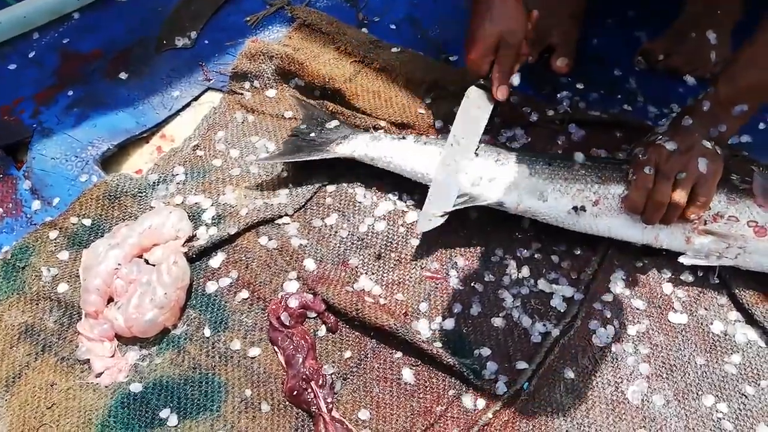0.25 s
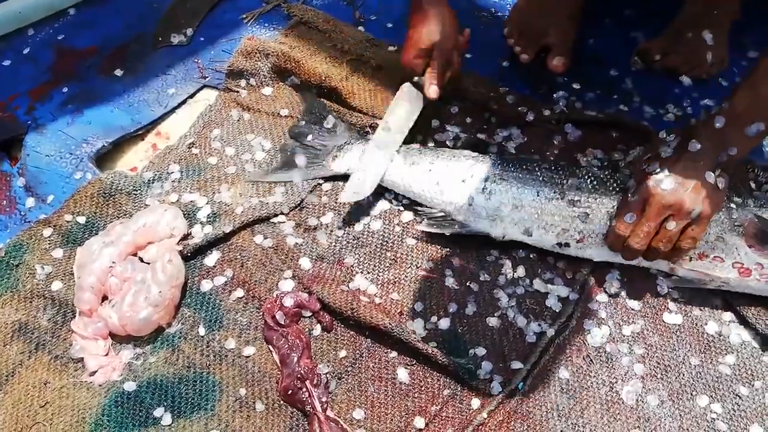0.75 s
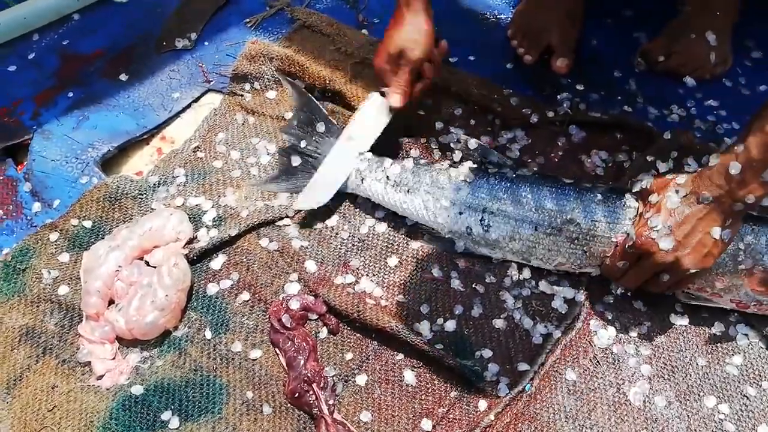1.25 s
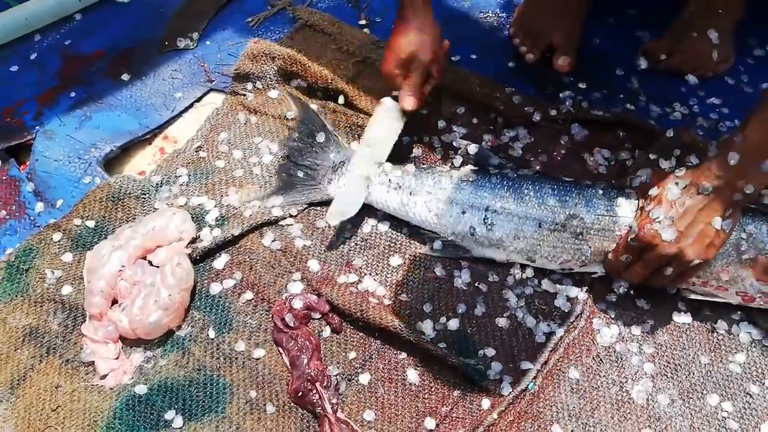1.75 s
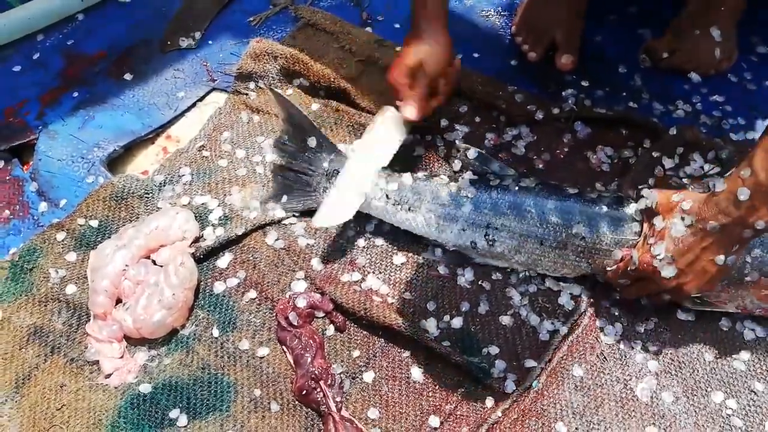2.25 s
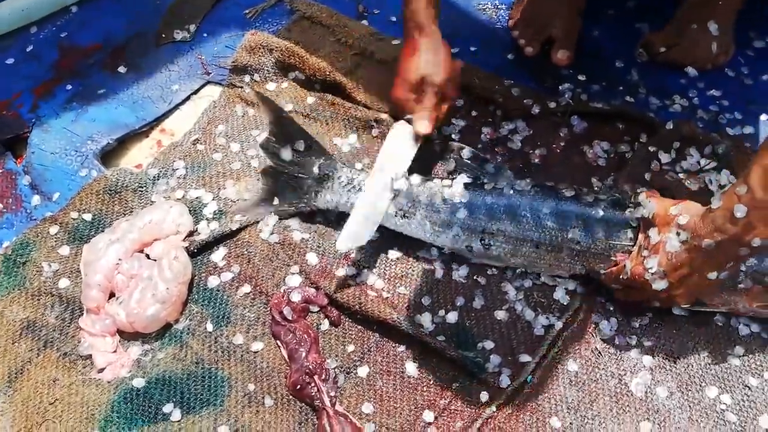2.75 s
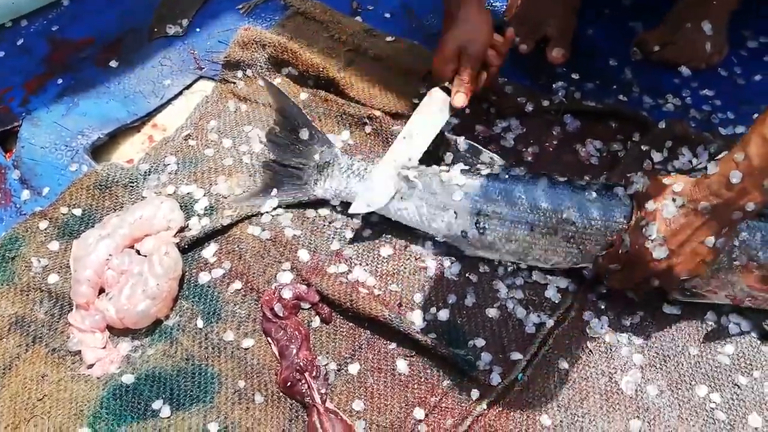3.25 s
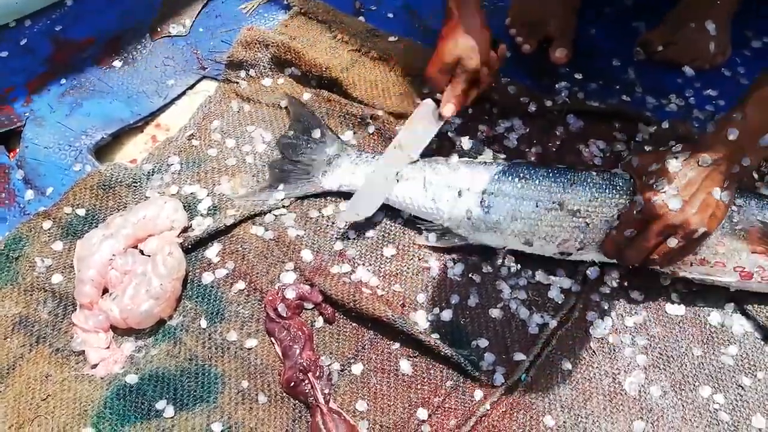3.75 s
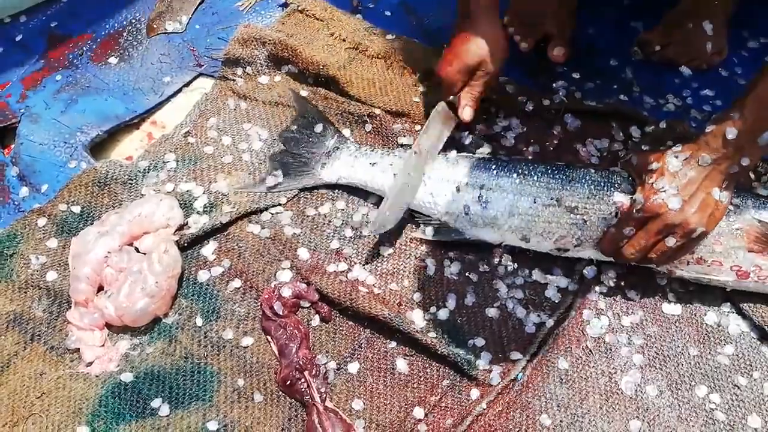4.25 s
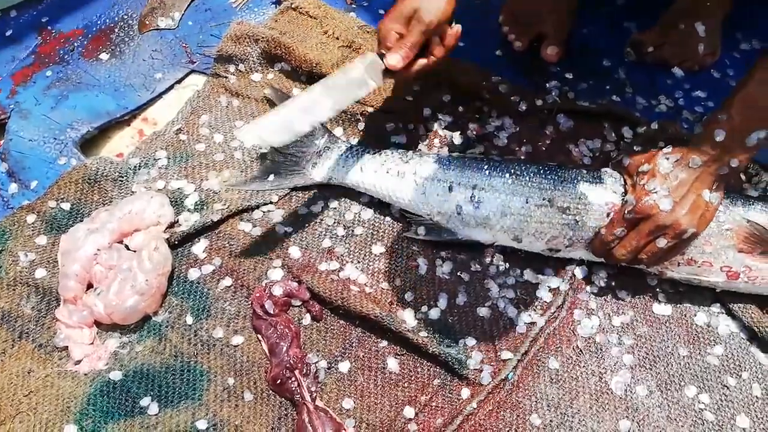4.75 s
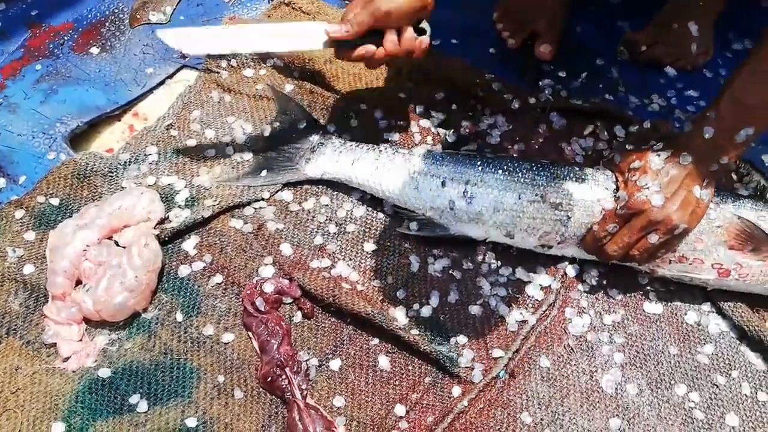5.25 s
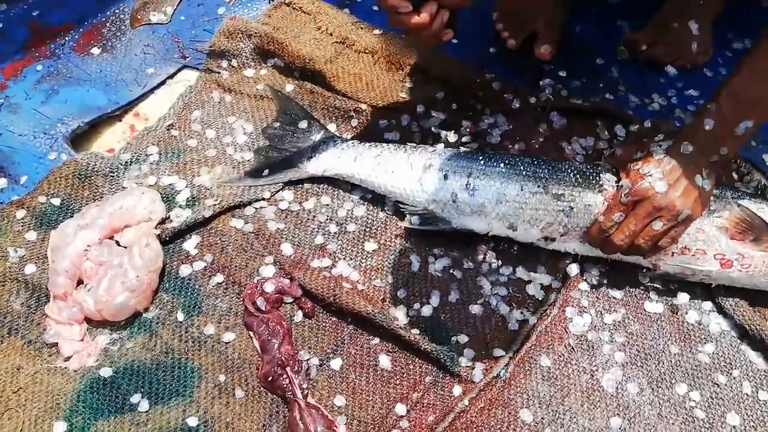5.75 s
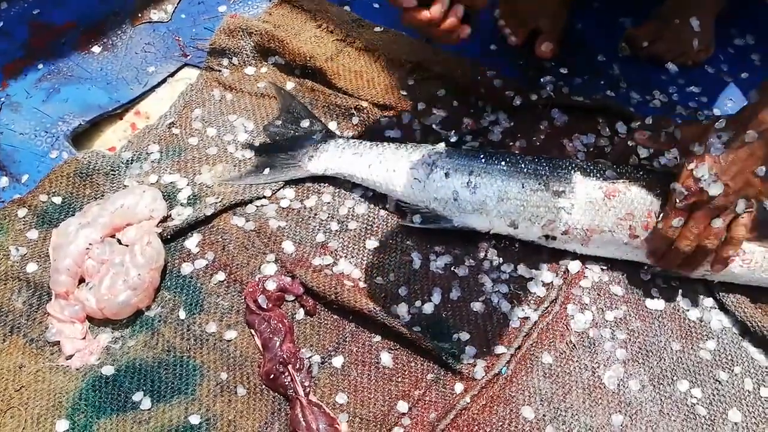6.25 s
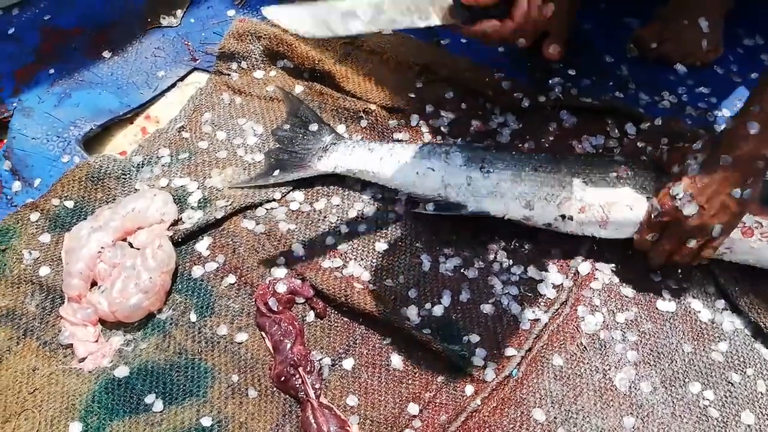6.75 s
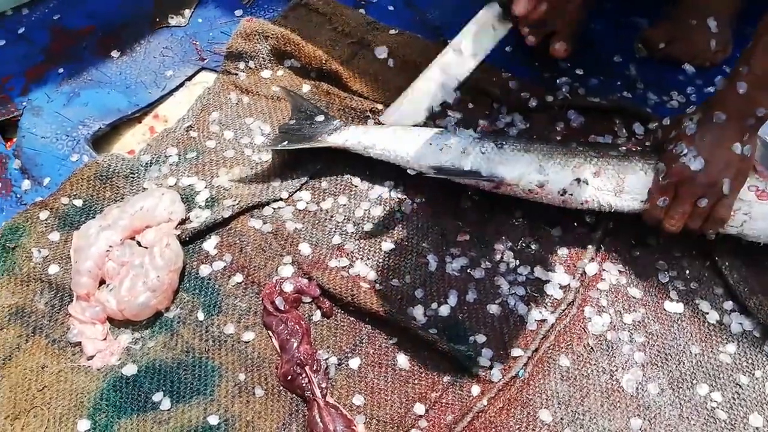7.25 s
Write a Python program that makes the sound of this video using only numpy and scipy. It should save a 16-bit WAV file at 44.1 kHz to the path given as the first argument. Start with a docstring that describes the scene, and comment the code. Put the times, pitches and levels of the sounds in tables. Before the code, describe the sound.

Quick, bright rasping scrapes of a blade on fish scales, close up on a boat, over a steady low engine hum and faint lapping water.

```python
"""Scaling a fish on a boat

A knife rakes the scales off a fish, about four quick strokes a second: each is a crackling burst of
snapping scales that makes the blade ring and scatters round the boat. An engine drones (tones in step with
its firing) and clatters (noise through ringing panels) below. A few waves swish past the hull as swells
of shaped noise and bubbles, and a gain control ducks briefly after the loudest strokes."""
import sys
import numpy as np
from scipy import signal
from scipy.fft import rfft, irfft, next_fast_len
from scipy.io import wavfile
from scipy.ndimage import uniform_filter1d, map_coordinates

SR = 44100
rng = np.random.default_rng(int(sys.argv[2]) if len(sys.argv) > 2 else 0)


def wrap_up_sound(samples):
    """Save the sound to the file named by the first command line argument, as 16-bit audio."""
    columns = np.atleast_2d(samples).T
    # keep every value between -1 and 1, then stretch to whole-number steps
    tamed = np.clip(columns, -1, 1)
    steps = np.round(tamed * 32767).astype(np.int16)
    wavfile.write(sys.argv[1], SR, steps)


N = 331191
TIME = np.arange(N) / SR  # s

# tone colours of the snapping scales, the rasping edge and the flesh: (f/Hz, density/dB per Hz)
SCALE_COLOUR = [(2500, -49.5), (6000, -4), (7000, -3), (8000, 0.5), (9600, 1), (10400, -1), (11300, -2),
                (13000, -6), (15500, -16.5)]
EDGE_COLOUR = [(1500, -28.5), (3300, -4.5), (4200, -1), (4800, 1.5), (5500, 0), (6100, -0.5), (7200, -7.5),
               (11000, -27.5)]
FLESH_COLOUR = [(250, -29), (600, -11.5), (1400, -5.5), (2000, 0), (2400, 5), (2900, 2.5), (3400, -2.5),
                (4500, -21), (8000, -44)]
# resonance where the knife touches: (half width/Hz, boost/dB)
SCALE_PEAK, EDGE_PEAK = (560, 5.5), (400, 6)
# engine speed: (t/s, firing rate/Hz)
ENGINE_SPEED = [(0, 43.97), (4, 44.09), (6, 43.87), (7.5, 43.92)]


def amp(db):
    """Decibels to gain."""
    return 10 ** (np.asarray(db) / 20)


def unit(x):
    """Scaled to rms 1."""
    return x / np.sqrt(np.mean(x ** 2) + 1e-20)


def along(points, hz):
    """(Hz, value) points read on a log frequency axis."""
    f, v = np.transpose(points)
    return np.interp(np.log(hz + 1), np.log(f + 1), v)


def curves(rows):
    """One value per sample for each column after the time."""
    s, *cols = np.transpose(rows)
    return [np.interp(TIME, s, c) for c in cols]


def wobble(rate):
    """A smooth random curve through `rate` random points a second."""
    points = rng.standard_normal(int(N * rate / SR) + 4)
    return map_coordinates(points, [TIME * rate])


def filtered(x, response):
    """x with each frequency multiplied by the response."""
    m = next_fast_len(x.shape[-1] + SR // 4)
    spectrum = rfft(x, m) * response(np.fft.rfftfreq(m, 1 / SR))
    return irfft(spectrum, m)[..., :x.shape[-1]]


def coloured(x, spectrum):
    """x shaped by the given spectrum, at rms 1."""
    return unit(filtered(x, lambda hz: amp(along(spectrum, hz))))


def impulse(spectrum, peak=(0, 1, 0), size=512):
    """A causal click of energy 1 with the given spectrum and one resonance (Hz, half width Hz, dB)."""
    f = np.fft.rfftfreq(size, 1 / SR)
    hz, width, db = peak
    resonance_db = db / (1 + ((f - hz) / width) ** 2)
    # folding the cepstrum puts the click's energy as early as possible
    cepstrum = irfft(np.log(amp(along(spectrum, f) + resonance_db)))
    cepstrum[1:size // 2] *= 2
    cepstrum[size // 2 + 1:] = 0
    click = irfft(np.exp(rfft(cepstrum)))
    return click[None] / np.linalg.norm(click)


def crackle(size, per_s, spread_db, shared):
    """Stereo train of tiny snaps of uneven size; a share of their power is the same in both channels."""
    happens = rng.random(size) < per_s / SR
    sizes = happens * amp(spread_db * rng.standard_normal(size))
    share = np.clip(shared, 0, 1)
    common = np.sqrt(share) * rng.standard_normal(size)
    separate = np.sqrt(1 - share) * rng.standard_normal((2, size))
    return unit(sizes * (common + separate))


def add(track, s, sound):
    """Mix a stereo sound in at time s."""
    start = max(round(s * SR), 0)
    track[:, start:start + sound.shape[1]] += sound[:, :N - start]


def drone(firings, waver_db=1.56, lag=0.00014):
    """Firing pulses shake the hull; unequal cylinders put weaker tones between the main ones."""
    # mean level of the firing tone, its octave and its second octave: (t/s, level/dB)
    firing_level = [(0, -25), (1.2, -27), (1.7, -32), (2.05, -25), (2.55, -28), (3.15, -29.5), (3.45, -26),
                    (7.5, -26.5)]
    octave_level = [(0, -38), (1.5, -37.5), (2.8, -43.5), (3.9, -34.5), (5.7, -32), (6.6, -38), (7.5, -35)]
    second_octave_level = [(0, -39), (1.5, -41), (1.9, -36.5), (2.7, -38.5), (3.6, -37), (4.5, -38.5),
                           (5.3, -37), (6.5, -40), (7.5, -39)]
    # weaker hull tones: (multiple of the firing rate, mean level/dB)
    hull_tones = [(2.17, -43.5), (3.0, -42.5), (3.5, -51), (4.75, -54), (5.0, -50), (6.0, -45.5),
                  (6.25, -52), (6.5, -51.5), (7.0, -48), (7.25, -56.5), (7.5, -60.5), (7.75, -59),
                  (8.0, -55), (8.25, -63), (9.0, -63), (12.0, -63.5)]
    # rumble, and rumble that is opposite in the two channels: (f/Hz, density/dB per Hz)
    rumble_colour = [(15, -36), (30, -7), (60, 0.5), (85, 1.5), (120, -3.5), (170, -4.5), (240, -10),
                     (320, -13.5), (400, -21), (600, -28.5), (1500, -56), (15000, -90)]
    sway_colour = [(30, -22), (100, -0.5), (200, 2), (320, -1.5), (500, -3.5), (1200, -21), (15000, -60)]
    flutter, throb = .28, .18  # depths of the boards' slow and fast buzz

    # lag in s: the tones reach the left channel first
    heard = firings + np.array([[.5], [-.5]]) * lag * ENGINE_SPEED[0][1]

    def tone(order, phase, slip):
        wander = slip * wobble(6.1)  # rad
        return np.sqrt(2) * np.cos(2 * np.pi * (order * heard + phase) + wander)

    hum = amp(curves(firing_level)[0] + .5 * wobble(10)) * tone(1, rng.random(), slip=.03)
    for order, level, slip in ((2, octave_level, .074), (4, second_octave_level, .089)):
        hum = hum + amp(curves(level)[0] + waver_db * wobble(5)) * tone(order, rng.random(), slip)
    for order, db in hull_tones:
        # the upper tones start within about two thirds of a cycle of each other and chug loosely
        phase = rng.random() * (1 if order < 5.8 else .65)
        hum = hum + amp(db + waver_db * wobble(5)) * tone(order, phase, slip=0.089)

    rumble = coloured(rng.standard_normal(N), rumble_colour)
    upper = filtered(rumble, lambda hz: np.clip((hz - 180) / 80, 0, 1))
    # the boards buzz once every two firings, in step with the shaft, and twice every firing
    buzz = flutter * np.cos(np.pi * firings) + throb * np.cos(4 * np.pi * firings)
    rumble = rumble + buzz * upper
    sway = coloured(rng.standard_normal(N), sway_colour)
    return hum + amp(-36.0) * rumble + amp(-47.0) * sway * np.array([[1], [-1]])


def clatter(firings, repeat=0.4, level_db=-46):
    """Valves and injectors tick on the ringing casing, partly alike in every cycle of four firings."""
    # overall colour: (f/Hz, density/dB per Hz)
    clatter_colour = [(200, -64), (450, -18), (620, 3), (820, 4.5), (1000, -2), (1320, 2.5), (1600, -2.5),
                      (2300, -4.5), (2750, -9), (3500, -10.5), (5000, -27.5), (8000, -15), (15000, -84)]
    # ringing engine panels: (f/Hz, width/Hz, boost/dB)
    casing_panels = [(528, 26, 4), (820, 30, 3.5), (876, 32, 3), (1056, 22, 10), (1849, 30, 13.5),
                     (2156, 40, 7), (2560, 50, 6), (3015, 80, 14), (3165, 50, 9), (3690, 50, 7),
                     (3980, 130, 10)]
    # left minus right: (f/Hz, level/dB)
    side_lean = [(300, 6), (550, 10.5), (850, 6.5), (1250, -7.5), (2500, -21.0), (5000, -11.5)]
    pitch_drift = .0022  # share by which the panels' pitch wavers

    cycle = crackle(SR // 11, per_s=6000, spread_db=4, shared=0)
    place = (firings / 4 % 1 * cycle.shape[1]).astype(int)
    share = np.clip(repeat, 0, 1)
    rattle = np.sqrt(share) * cycle[:, place] + np.sqrt(1 - share) * rng.standard_normal((2, N))
    rattle = rattle * amp(.8 * wobble(4))

    def casing(f):
        panels_db = sum(db / (1 + (2 * (f - hz) / width) ** 2) for hz, width, db in casing_panels)
        lean_db = along(side_lean, f) * np.array([[.5], [-.5]])
        return amp(along(clatter_colour, f) + panels_db + lean_db)

    ringing = filtered(rattle, casing)
    clock = np.cumsum(1 + pitch_drift * wobble(9))  # reading at an uneven pace bends the pitch
    bent = [map_coordinates(channel, [clock], mode='mirror') for channel in ringing]
    return amp(level_db) * unit(np.array(bent))


def lapping(level_db=-52, restless_db=3.5):
    """Ripples keep licking the hull: crackling noise of restless level, stronger on the right."""
    # (f/Hz, density/dB per Hz)
    ripple_colour = [(600, -19), (1300, 3), (1900, -4.5), (2350, 4.5), (2900, -10), (5000, -36),
                     (15000, -60)]
    water = coloured(crackle(N, per_s=2500, spread_db=4, shared=0.06), ripple_colour)
    return amp(level_db + restless_db * wobble(12)) * water * amp([[-1], [1]])


def bubbles(count=2500, centre_hz=1500, cycles=9):
    """Stereo swarm of small bubbles at rms 1, each a short ring of rising pitch."""
    track, t = np.zeros((2, N)), np.arange(SR // 40) / SR
    starts = rng.random(count) * N / SR
    for s, pitch, size, side in zip(starts, *rng.standard_normal((3, count))):
        turns = centre_hz * np.exp(.45 * pitch) * t
        ring = np.exp(-turns / cycles) * np.sin(2 * np.pi * turns * (1 + 4 * t))
        add(track, s, amp(1.5 * size + 3.5 * side * np.array([[1], [-1]])) * ring)
    return unit(track)


def wash(bubble_db=-9, wake_spray_db=-4):
    """Each wave swells along the hull and dies away, sloshing, bubbling and throwing fizzing spray."""
    # waves: (start t/s, rise/s, time to fall 60 dB/s, spray level/dB, slosh level/dB)
    passing_waves = [(1.69, 0.32, 2.5, -35.5, -48.5), (2.262, 0.053, 1.6, -36, -36.5),
                     (2.348, 0.16, 1.2, -65, -45)]
    # stirred water all the while, its spray set apart by wake_spray_db: (t/s, slosh level/dB)
    stirred_water = [(1.6, -51.5), (3, -51)]
    # colours of spray and slosh: (f/Hz, density/dB per Hz)
    spray_colour = [(800, -28), (1900, 4), (3200, 2.5), (6000, 2.5), (8200, 2), (9500, 7), (10600, -0.5),
                    (11800, -2.5), (13500, -9), (15500, -22)]
    slosh_colour = [(250, -3), (500, -22), (900, -1), (1500, -2), (2300, -0.5), (3200, -10.5),
                    (6000, -13.5), (12000, -45)]

    wake_db, = curves(stirred_water)
    spray_power, slosh_power = amp(wake_db + wake_spray_db) ** 2, amp(wake_db) ** 2
    for s, rise, t60, spray_db, slosh_db in passing_waves:
        swell = np.sin(np.pi / 2 * np.clip((TIME - s) / rise, 0, 1)) ** 2
        swell = swell * amp(-60 * np.maximum(TIME - s - rise, 0) / t60)
        spray_power = spray_power + (amp(spray_db) * swell) ** 2
        slosh_power = slosh_power + (amp(slosh_db) * swell) ** 2

    spray = coloured(crackle(N, per_s=16000, spread_db=2.5, shared=.1), spray_colour)
    slosh = coloured(rng.standard_normal((2, N)), slosh_colour) + amp(bubble_db) * bubbles()
    gusts = amp(1.1 * wobble(22) + .6 * wobble(70))
    return np.sqrt(spray_power) * gusts * spray + np.sqrt(slosh_power) * amp(wobble(28)) * slosh


def knocks(order=3):
    """Bumps, slaps and a knock of the knife: each a short swell of noise in one broad resonance."""
    # bumps and slaps on the boat, and at 1.602 s a knock of the knife at the fish's tail:
    # (t/s, f/Hz, time to the swell's peak/s, level/dB)
    hits = [(.06, 800, .03, -47.5), (.686, 205, .01, -27.5), (.738, 160, .012, -33),
            (1.498, 1950, .008, -41.5), (1.602, 3500, .005, -29), (2.31, 450, .014, -42),
            (2.312, 1150, .012, -43), (3.602, 570, .007, -38.5), (4.49, 200, .018, -34),
            (7.235, 650, .008, -45)]
    track, t = np.zeros((2, N)), np.arange(SR // 4) / SR
    for s, hz, length, db in hits:
        swell = t / length * np.exp(1 - t / length)
        push = crackle(len(t), per_s=SR, spread_db=0, shared=.8) * swell
        body = filtered(push, lambda f: (1 + 1j * (f - hz) / min(hz / 2, 400)) ** -order)
        add(track, s, amp(db) * unit(body) * np.sqrt(2 * length / t[-1]))  # short knocks hold less energy
    return track


def rustle(level_db=-53, shift_db=-2.5, flicker_db=1.0):
    """Loose scales patter down all the while; each shift on the wet sack adds a soft crinkle."""
    # colours of patter and crinkle: (f/Hz, density/dB per Hz)
    patter_colour = [(2000, 8), (4500, 8.5), (6800, -19), (8300, 0.5), (9700, 0), (11500, -9), (13500, -5),
                     (15500, -61)]
    crinkle_colour = [(1000, -30), (2200, 2.5), (4500, -0.5), (6800, -3), (9400, 1.5), (12000, -6),
                      (15500, -18)]
    # the fish and the hand shift on the sack: (middle t/s, half length/s, level before shift_db/dB)
    sack_shifts = [(0.022, .04, -51), (.19, .07, -50), (1.19, .04, -50), (1.28, .04, -52),
                   (3.0, .08, -51.5), (3.79, .02, -50), (3.915, 0.033, -47.5), (4.68, .07, -47),
                   (4.82, .04, -43.5), (4.92, .06, -49), (5.098, .06, -51), (5.39, .05, -48),
                   (5.54, .04, -51), (5.735, .02, -43.5), (6.238, 0.017, -42), (6.47, .04, -47),
                   (6.74, 0.012, -35), (6.919, .025, -46.5), (7.053, 0.044, -48), (7.265, 0.028, -42),
                   (7.416, 0.03, -47)]
    patter = coloured(crackle(N, per_s=16000, spread_db=2, shared=.1), patter_colour)
    crinkle = coloured(crackle(N, per_s=7000, spread_db=3, shared=.1), crinkle_colour)
    power = sum(amp(db) ** 2 * np.exp(-((TIME - s) / half) ** 2) for s, half, db in sack_shifts)
    patter = amp(level_db + flicker_db * wobble(25)) * patter
    return patter + amp(shift_db + 1.6 * wobble(90)) * np.sqrt(power) * crinkle


def ticks(trim_db=-13, fall_t60=0.058):
    """Loose scales land with tiny clicks: brief dying crackles (fall_t60: s to fall 60 dB)."""
    # (t/s, level before trim_db/dB)
    landings = [(1.956, -44), (2.294, -33), (3.7339, -45), (3.8914, -43), (4.359, -37), (4.4054, -51),
                (4.4727, -44), (5.9933, -43), (6.346, -40.5), (6.3806, -38.5), (6.4896, -36),
                (6.567, -40.5), (6.787, -39), (7.0026, -32.5), (7.0643, -45), (7.3502, -37)]
    track, t = np.zeros((2, N)), np.arange(SR // 20) / SR
    for s, db in landings:
        snaps = amp(-60 * t / fall_t60) * crackle(len(t), per_s=9000, spread_db=5, shared=.1)
        click = unit(signal.fftconvolve(snaps, impulse(SCALE_COLOUR), axes=1))
        add(track, s, amp(db + trim_db) * click)
    return track


def deck(x, wet_db=-8, build=0.00066, uneven_db=1, count=30):
    """Planks and hull scatter the sound in clumps of echoes, with a fresh random pattern for each stretch."""
    # (f/Hz, time to fall 60 dB/s)
    echo_fall = [(300, 0.07), (2000, 0.17), (5000, 0.13), (10000, 0.13), (15000, 0.11)]
    out = np.zeros((2, N))
    for part in np.array_split(np.arange(N), count):
        hz, t, z = signal.stft(rng.standard_normal((2, SR // 5)), SR, nperseg=256)
        fall = amp(-60 * t / along(echo_fall, hz)[:, None])
        tail = signal.istft(z * fall, SR, nperseg=256)[1]
        size = tail.shape[1]
        tail = tail * (1 - np.exp(-np.arange(size) / SR / build))  # the echoes build up over `build` s
        clumps = map_coordinates(rng.standard_normal(128), [np.arange(size) * 500 / SR])
        tail = tail * amp(uneven_db * clumps)
        add(out, part[0] / SR, signal.fftconvolve(x[:, part], tail / np.linalg.norm(tail[0]), axes=1))
    return amp(wet_db) * out


def blade(x):
    """The steel rings briefly at its own pitches, damped by the fish and the hand."""
    # (f/Hz, relative level/dB, time to fall 60 dB/s)
    steel_modes = [(2450, -9, .03), (4720, 0, .03), (9270, -1, .02), (10400, -13, .018)]
    ring_db = -28
    t = np.arange(SR // 8) / SR
    ring = sum(amp(db - 60 * t / t60) * np.cos(2 * np.pi * hz * t) for hz, db, t60 in steel_modes)
    return amp(ring_db) * signal.fftconvolve(x, ring[None] / np.linalg.norm(ring), axes=1)[:, :N]


def cracks():
    """A stiff scale breaks off with one sharp click within a few of the hard strokes."""
    # (t/s, mean click level/dB)
    breaks = [(.3192, -2), (4.761, -7), (5.933, -6), (6.43, -2), (6.7007, -4)]
    track = np.zeros((2, N))
    for s, db in breaks:
        side_db = 2 * rng.standard_normal() * np.array([[1], [-1]])
        add(track, s, amp(db + side_db) * impulse(SCALE_COLOUR))
    return track


def drags(flesh_db=-13, snap_hz=9200, edge_hz=4750):
    """Scale after scale flicks up under the edge, which slides on in little jerks."""
    # (t/s, length/s, level before a 3 dB cut/dB, edge rasp against the scales/dB)
    edge_slides = [(0.06, 0.045, -31, -12), (0.268, 0.05, -32, -3.5), (0.557, 0.042, -26, -6.5),
                   (1.389, 0.025, -35.5, -4), (1.613, 0.019, -26, -6), (2.36, 0.043, -35, -5),
                   (3.562, 0.021, -28.5, -5), (3.576, 0.032, -31, 0), (4.09, 0.022, -37, 0.5),
                   (4.989, 0.0079, -21, -7), (6.989, 0.019, -36.5, -5)]
    track, t = np.zeros((2, N)), np.arange(SR // 10) / SR
    scales = impulse(SCALE_COLOUR, (snap_hz, *SCALE_PEAK))
    edge = impulse(EDGE_COLOUR, (edge_hz, *EDGE_PEAK))
    flesh = impulse(FLESH_COLOUR)
    for s, length, db, edge_db in edge_slides:
        jerks = unit(amp(2 * map_coordinates(rng.standard_normal(32), [t * 300])))
        force = np.clip(np.minimum(t, length - t) / 0.0055, 0, 1) * jerks
        for colour, part_db in zip((scales, edge, flesh), (0, edge_db, flesh_db)):
            snaps = force * crackle(len(t), per_s=4500, spread_db=3.5, shared=.1)
            add(track, s, amp(db + part_db - 3) * signal.fftconvolve(snaps, colour, axes=1))
    return track


def strokes(fall_t60=0.04, trim_db=-9.5, bite_shape=0.81):
    """The edge bites in jerks until scales let go; scales and edge ring at pitches set by the contact point."""
    # knife strokes, levels before trim_db: (t/s, bite time/s, scales level/dB, scales f/Hz,
    # edge rasp level/dB, edge f/Hz, flesh level/dB, top treble of the scales/dB)
    knife_strokes = [(0.0427, 0.012, -24.5, 9050, -27.5, 5160, -34, 2),
                     (0.086, 0.0033, -37, 8650, -36, 6200, -38, -2),
                     (0.291, 0.0015, -26.5, 9700, -37, 4750, -35.5, 10),
                     (0.315, 0.0033, -17, 10000, -28.5, 4480, -37.5, 6),
                     (0.55, 0.0051, -29, 9000, -26.5, 4500, -34.5, 6),
                     (0.8519, 0.0046, -20.5, 9400, -26, 3550, -32.5, -5),
                     (0.898, 0.002, -33.5, 9700, -36, 5200, -49, 1),
                     (1.1054, 0.0044, -22, 9150, -26.5, 4800, -37, 1),
                     (1.357, 0.0029, -23, 9600, -25.5, 4700, -35.5, 3),
                     (1.6, 0.0039, -21, 9200, -22, 4600, -23, 0),
                     (1.852, 0.0054, -22, 10500, -26, 5900, -37, 1),
                     (2.0918, 0.0084, -23, 9200, -24, 4500, -29.5, 3),
                     (2.3506, 0.0061, -20.5, 9500, -25.5, 5900, -31, 0),
                     (2.602, 0.0083, -22.5, 7700, -28.0, 4970, -33, 4),
                     (2.84, 0.0083, -19.5, 10900, -23, 4770, -29, -4),
                     (3.0756, 0.0038, -18, 10300, -27.5, 4500, -27, -1),
                     (3.3095, 0.0044, -21, 8400, -28, 4950, -36.5, 3),
                     (3.5555, 0.0054, -24.5, 9400, -28.5, 6000, -36.5, 6),
                     (3.601, 0.0041, -27.5, 9100, -34, 5550, -46.5, 0),
                     (3.824, 0.0051, -25.5, 9700, -32.5, 4500, -38.5, 3),
                     (4.069, 0.0021, -18.5, 8550, -24.5, 6150, -28, 3),
                     (4.295, 0.0041, -21.5, 9600, -25.5, 6100, -28.5, 6),
                     (4.53, 0.0034, -22, 9000, -25, 4200, -29.5, 2),
                     (4.759, 0.0024, -17, 10300, -23.5, 5060, -26.5, 4),
                     (4.979, 0.0048, -22, 8300, -29, 3900, -34, 3),
                     (5.201, 0.0052, -20.5, 8000, -25.5, 4300, -32.5, 4),
                     (5.4468, 0.0027, -24.5, 8000, -28, 4000, -30.5, 6),
                     (5.686, 0.0049, -27.5, 8750, -30.5, 4900, -32, 4),
                     (5.929, 0.0024, -16.5, 7540, -23, 3830, -29, -5),
                     (6.1703, 0.003, -18.5, 10050, -25, 4530, -32, -4),
                     (6.4256, 0.0035, -20, 9500, -25.5, 5200, -29.5, -6),
                     (6.6952, 0.0051, -16, 10500, -24, 5240, -28.5, -9),
                     (6.9704, 0.0019, -27.5, 7850, -35, 4800, -34, -4),
                     (7.232, 0.0073, -27.5, 9500, -35.5, 4650, -35.5, 9),
                     (7.503, 0.0034, -28, 9700, -38, 4400, -42, 2)]
    # where the scales snap: (t/s, left minus right level/dB)
    scale_pan = [(0, .3), (2.6, -.3), (3.1, -1.8), (6.2, -2.6), (7.3, -.5)]
    treble_hz = (8950, 12000)  # the treble change starts and is full
    jerk_db, jerks_per_s = 1.8, 700  # the edge catches and slips within a stroke

    track, t = np.zeros((2, N)), np.arange(SR // 16) / SR
    for s, bite, snap_db, snap_hz, edge_db, edge_hz, flesh_db, treble_db in knife_strokes:
        lean_db = np.interp(s, *np.transpose(scale_pan)) + .8  # 0.8 makes up for the knife's tilt in scene()
        pans = amp([[lean_db / 2], [-lean_db / 2]]), amp([[-.6], [.6]]), amp([[-1.5], [1.5]])

        rise = np.minimum(t / max(bite, .002), 1) ** bite_shape
        jerks = amp(jerk_db * map_coordinates(rng.standard_normal(64), [t * jerks_per_s]))
        force = rise * jerks * amp(-60 * np.maximum(t - bite, 0) / fall_t60)
        snaps = force * crackle(len(t), per_s=16000, spread_db=3, shared=.07)

        bright = [(hz, db + np.interp(hz, treble_hz, [0, treble_db])) for hz, db in SCALE_COLOUR]
        scales = impulse(bright, (snap_hz, *SCALE_PEAK))
        edge = impulse(EDGE_COLOUR, (edge_hz, *EDGE_PEAK))
        flesh = impulse(FLESH_COLOUR)
        for colour, pan, db in zip((scales, edge, flesh), pans, (snap_db, edge_db, flesh_db)):
            sound = unit(signal.fftconvolve(snaps, colour, axes=1))
            add(track, s, pan * amp(db + trim_db) * sound)
    return track


def scene():
    """The knife close by, over the engine and the water."""
    firings = np.cumsum(curves(ENGINE_SPEED)[0]) / SR  # count of firings so far
    engine = drone(firings) + clatter(firings)
    water = lapping() + wash()
    scrape = strokes() + drags() + cracks()
    knife = (scrape + blade(scrape) + ticks()) * amp([[-.4], [.4]])
    return engine + water + knocks() + rustle() + deck(knife) + knife


def record(dry, threshold_db=-21.0, slope=0.47, release_db_per_s=18, lag=0.0024):
    """Gain control ducks after loud peaks and creeps back; then the highest treble is cut off."""
    top_hz = 15700
    power = np.abs(uniform_filter1d(np.mean(dry ** 2, axis=0), size=128))
    level_db = 10 * np.log10(power + 1e-9)
    # a running maximum on a rising ramp lets the ducking recover at a steady pace
    ramp = release_db_per_s * TIME
    duck_db = np.maximum.accumulate(slope * np.maximum(level_db - threshold_db, 0) + ramp) - ramp
    keep = np.exp(-1 / (lag * SR))  # the gain follows with a lag in s
    duck_db = signal.lfilter([1 - keep], [1, -keep], duck_db)
    return filtered(dry * amp(-duck_db), lambda hz: 1 / np.sqrt(1 + (hz / top_hz) ** 160))


dry = scene()
out = record(dry)
wrap_up_sound(out)
```